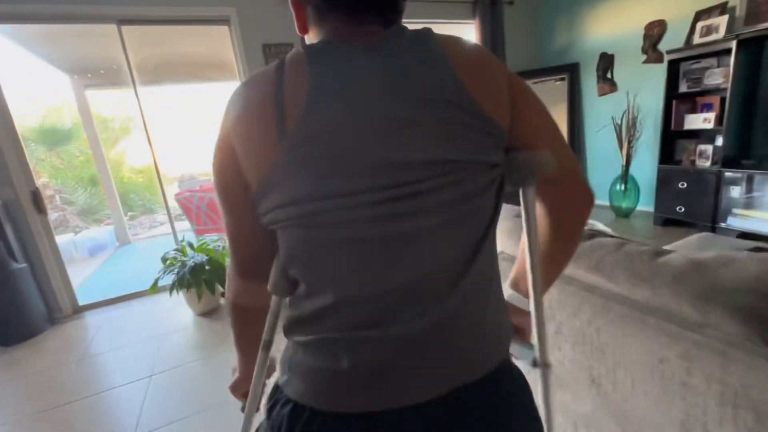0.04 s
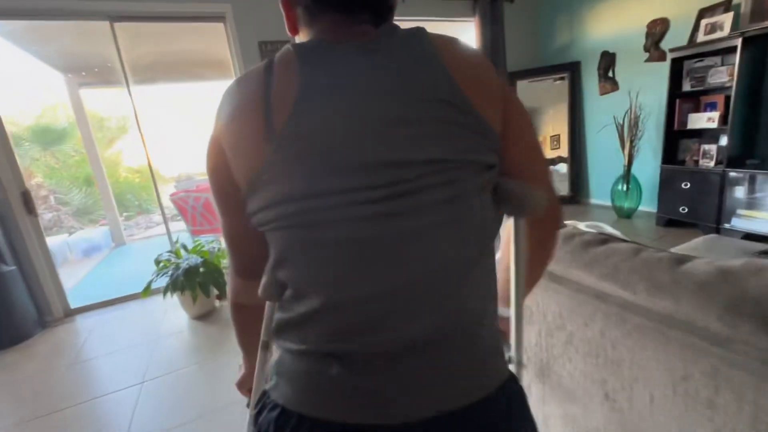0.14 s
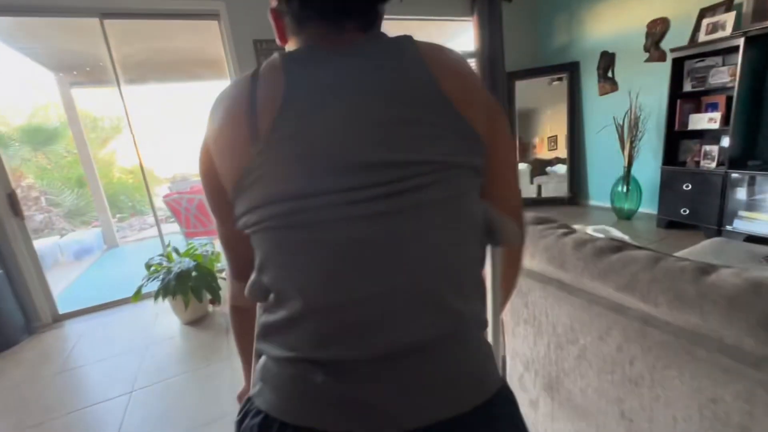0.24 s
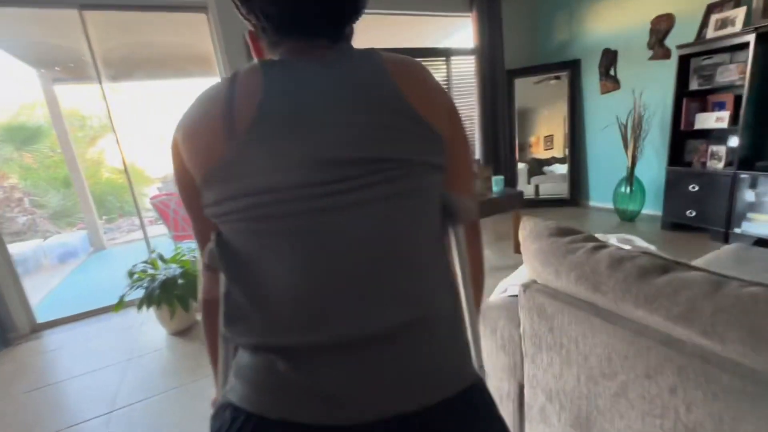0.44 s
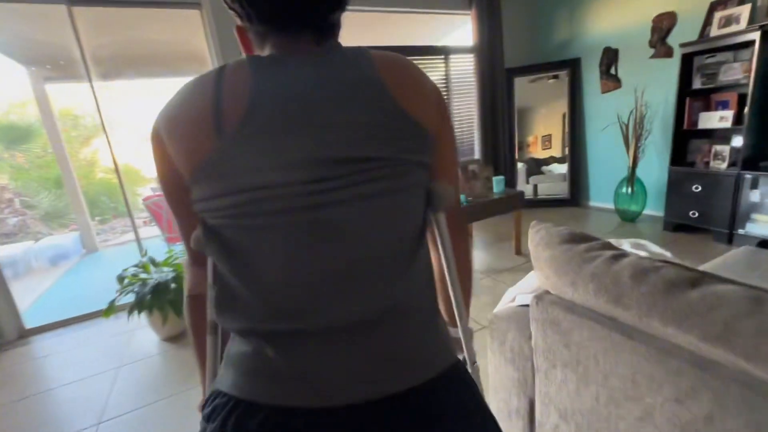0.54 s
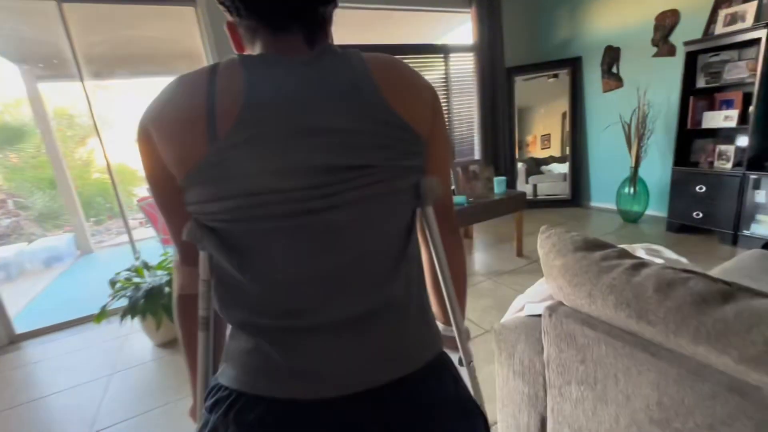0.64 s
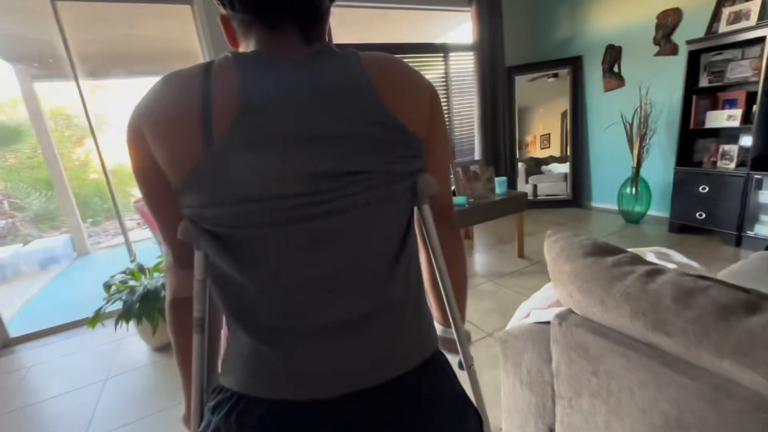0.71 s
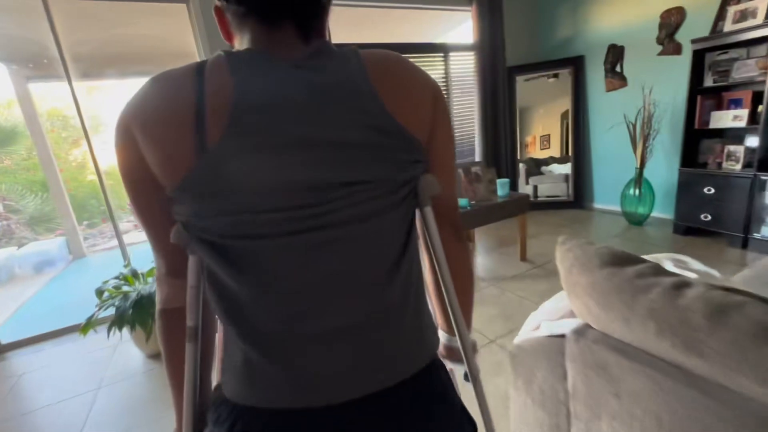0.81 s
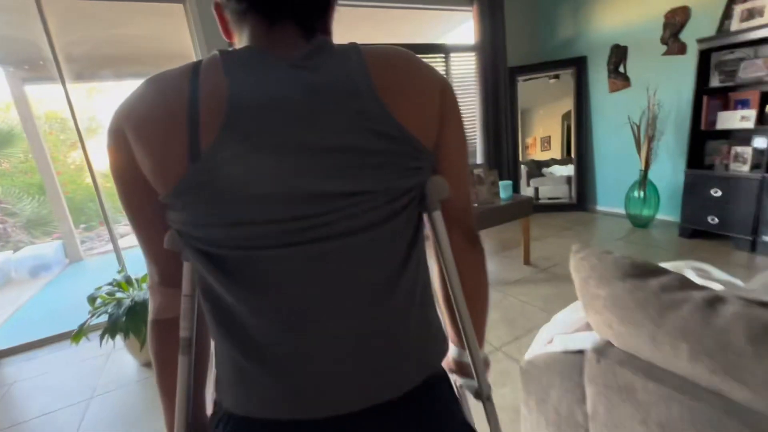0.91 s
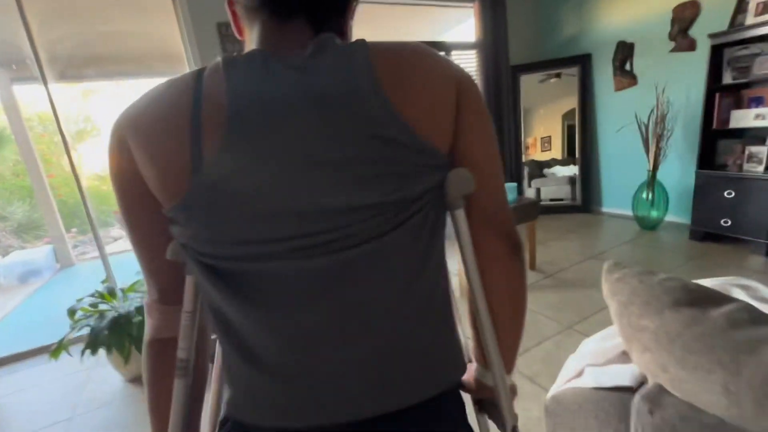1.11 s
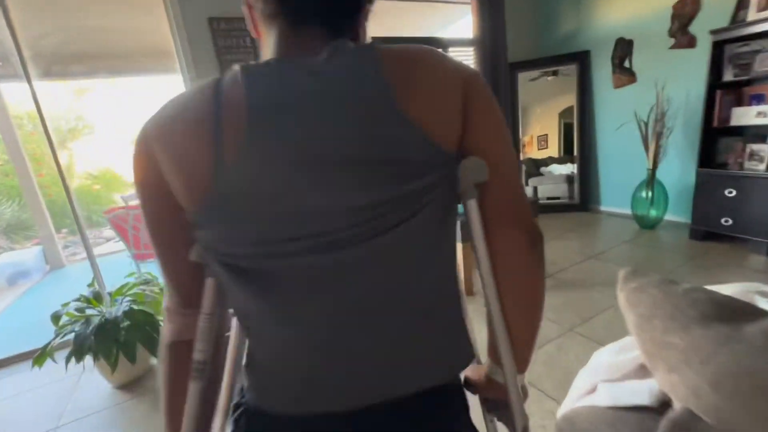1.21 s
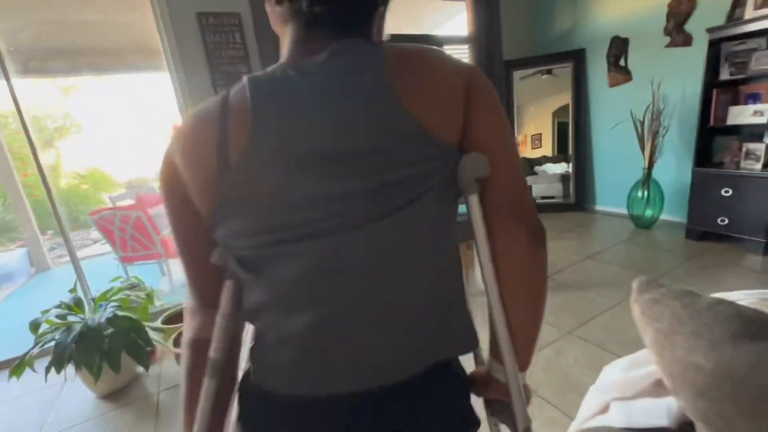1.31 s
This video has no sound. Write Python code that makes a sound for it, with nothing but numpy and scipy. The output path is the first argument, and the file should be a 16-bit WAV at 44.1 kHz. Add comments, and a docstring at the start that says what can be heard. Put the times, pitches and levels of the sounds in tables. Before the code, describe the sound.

An aluminium crutch lands once on a tiled living room floor with a sharp clack and a brief metallic ring. Clothes and a foot then brush softly, with a few light knocks over quiet room noise.

```python
"""A tiled living room: an aluminium crutch is planted. The rubber tip knocks, the loose telescoping
tube clacks against its sleeve and rings, and the room answers with wall echoes and a diffuse tail.
Then clothes and a foot brush along as the walker swings forward, with a few soft knocks and a low
rumble, over quiet room noise. Knocks and ringing are damped modes; the rest is shaped noise."""
import sys
import numpy as np
from scipy import signal
from scipy.fft import rfft, irfft
from scipy.io import wavfile
from scipy.ndimage import uniform_filter1d

SR = 44100
rng = np.random.default_rng(int(sys.argv[2]) if len(sys.argv) > 2 else 0)


def output_pcm(signal):
    """Save a mono or channel-first signal as 16-bit PCM at the path in sys.argv[1].

    Samples are clipped to [-1, 1] before scaling.
    """
    pcm = np.clip(np.atleast_2d(signal).T, -1, 1) * 32767
    wavfile.write(sys.argv[1], SR, np.round(pcm).astype(np.int16))


N = 59535
TIME_S = np.arange(N) / SR

# Spectra give relative density; pan and balance are left minus right.
# room noise spectrum: f/Hz, level/dB
AMBIENCE_SPECTRUM = [(25, -18), (60, -6), (90, -13), (120, -1.5), (155, -10), (200, -2), (260, -5.5),
                     (340, -5.5), (450, -8), (750, -10.5), (1150, -19.5), (2000, -21.5), (6700, -34),
                     (7700, -41), (8400, -50), (10000, -39), (12000, -53), (15000, -43)]
# room noise envelope: t/s, level/dB
AMBIENCE_ENVELOPE = [(0, -63), (.25, -60.5), (.55, -59), (.72, -59.5), (.95, -59), (1.24, -58.5),
                     (1.35, -62.5)]
# diffuse field: f/Hz, left-right correlation/1
COHERENCE = [(50, 0.02), (130, 0.77), (290, 0.78), (640, 0), (1400, 0.08), (15000, 0)]
# reverberation: f/Hz, t60/s
ROOM_DECAY = [(60, 1.1), (200, 0.54), (700, 0.5052), (1800, 0.78), (4800, 0.4648), (9000, 0.3),
              (14500, 0.1)]
# reflections: delay/s, left/dB, right/dB
WALL_ECHOES = [(0.012, -10, -20.5), (.0202, -13, -21), (.0495, -23, -4.5), (.054, -12, -11.5),
               (0.064, -34, -7)]
# microphone mismatch: f/Hz, balance/dB
STEREO_BALANCE = [(100, -0.5), (350, 2), (700, 1), (1300, 0.5), (2300, -2), (4400, 1.5), (6500, 5),
                  (8400, -8), (12000, 2)]

# rumble spectrum: f/Hz, level/dB
RUMBLE_SPECTRUM = [(20, -26), (40, -6), (55, 14), (75, -5), (120, -20), (400, -58), (2000, -90)]
# rumble envelope: t/s, level/dB
RUMBLE_ENVELOPE = [(0, -85), (.12, -72), (.21, -72), (.26, -62), (.35, -75), (.5, -71), (.58, -55),
                   (.68, -81), (.88, -75), (.95, -59), (1.08, -82), (1.17, -67), (1.35, -78)]
# clothes and foot spectrum: f/Hz, level/dB
BRUSH_SPECTRUM = [(200, -2.5), (500, -21), (850, -1.5), (1300, 3), (2100, -1), (3000, -3.5), (4500, -11.5),
                  (7000, -15.5), (10000, -14.5), (12000, -36), (15000, -28)]
# clothes and foot envelope: t/s, level/dB
BRUSH_ENVELOPE = [(0, -71), (.12, -71.5), (.2, -58.5), (.45, -66), (.7, -73.5), (.82, -66.5), (.9, -61.5),
                  (.96, -57.5), (1.04, -60.5), (1.11, -55), (1.16, -54), (1.21, -62.5), (1.29, -68),
                  (1.35, -57)]
# high hiss of movement, coloured by the right microphone's 8-9 kHz resonance: f/Hz, level/dB
HISS_SPECTRUM = [(2000, -6.5), (4300, -7.5), (6000, -9.5), (7700, -11), (8350, 4.5), (9000, -2.5),
                 (10000, -11.5), (11500, -23), (15000, -38)]
# movement hiss envelope: t/s, level/dB
HISS_ENVELOPE = [(0, -79), (.17, -69.5), (.5, -76), (.7, -75.5), (.8, -74), (.86, -65.5), (.94, -69),
                 (1.02, -72), (1.1, -66.5), (1.2, -72.5), (1.35, -70)]
# foot and crutch touches: t/s, mode gain/dB, f/Hz, t60/s, thud gain/dB, pan/dB
TOUCHES = [(0.134, -51.5, 1130, 0.025, -56, -14), (0.9415, -47, 3800, .012, -67, -2),
           (0.9888, -40, 1800, 0.012, -45.5, -6), (0.9948, -51.5, 860, 0.032, -51, 18.5),
           (1.3400, -35.5, 4400, 0.0041, -73, -3), (1.3420, -41.5, 1525, 0.023, -55, -10.5)]
# reverberation of the touches: f/Hz, level/dB
TOUCH_TAIL_SPECTRUM = [(100, -2), (350, 0), (650, 1.5), (1100, -2.5), (1700, 0), (4000, -3.5), (12000, -8)]

# tube modes: f/Hz
TUBE_MODES_HZ = [606, 774, 959, 1035, 1304, 1346, 1408, 1490, 1548, 1585, 1672, 1705, 1968, 2223, 2589]
# tube modes, same order: relative level/dB, t60/s
TUBE_DECAYS = [(-1, 0.53), (-1, 0.34), (-0.5, 0.48), (-15, 0.71), (-1, 0.42), (-0.5, 0.55), (0, 0.51),
               (-1, 0.44), (1.5, 0.39), (-10, 0.26), (-4, 0.49), (4, 0.36), (0, .42), (1.5, 0.47),
               (-11, 0.72)]
# clack spectrum: f/Hz, level/dB
CLACK_SPECTRUM = [(300, -15), (700, -4), (1150, -11), (1500, 4), (2350, 3), (3000, -4), (4200, -6.5),
                  (5600, -1), (7200, -9.5), (9200, 0), (10500, -5), (12000, -24.5), (15000, -11)]
# tube-on-sleeve impacts: t/s, relative level/dB, pan/dB
SLEEVE_HITS = [(0.2225, -24.5, -7), (0.2247, -25.5, -4), (0.2264, -18.5, -5.5), (0.2286, -20, 0.5)]
# tip and floor modes: f/Hz, relative level/dB, t60/s
TIP_MODES = [(244, -25, 0.024), (690, -14.5, 0.0084), (978, -9, 0.04), (1343, -7, 0.022),
             (1570, -5.5, 0.037), (2270, -7, 0.015)]
# reverberation of the tap: f/Hz, level/dB
TAP_TAIL_SPECTRUM = [(50, -8.5), (100, -9.5), (200, -8), (400, -3.5), (600, -0.5), (950, 3.5), (1150, 0.5),
                     (1450, 3.5), (1800, -1), (2400, -4.5), (2900, -9), (4200, -11), (5600, -3.5),
                     (7300, -12), (8300, -3.5), (9500, -2), (10500, -13), (12000, -40), (14500, -14)]

TAP_S, TIP_CUTOFF_HZ = 0.2240, 2550


def from_db(db):
    """Decibels to gain."""
    return 10 ** (np.asarray(db) / 20)


def unit_rms(x):
    """Scale to rms 1."""
    return x / np.sqrt(np.mean(x ** 2) + 1e-20)


def at_hz(points, hz):
    """Interpolate over log frequency."""
    points_hz, values = np.transpose(points)
    return np.interp(np.log(np.maximum(hz, 1)), np.log(points_hz), values)


def envelope(rows):
    """Gain curve from t/s, level/dB rows."""
    return from_db(np.interp(TIME_S, *np.transpose(rows)))


def pan(db):
    """Left and right gains."""
    return from_db(np.array([[db], [-db]]) / 2)


def click(t_s):
    """Unit impulse."""
    return 1.0 * (np.arange(N) == round(t_s * SR))


def ring(x, hz, t60_s):
    """Damped mode; a unit impulse rings at height 1."""
    radius = from_db(-60 / (t60_s * SR))
    step_rad = 2 * np.pi * hz / SR
    return signal.lfilter([.5, 0, -.5], [1, -2 * radius * np.cos(step_rad), radius ** 2], x + 1e-18)


def soften(x, cutoff_hz, order=2):
    """Low-pass: a yielding contact or dull reflection."""
    return signal.sosfilt(signal.butter(order, cutoff_hz, fs=SR, output="sos"), x + 1e-18)


def convolve(x, response):
    """Apply a stereo response."""
    return signal.fftconvolve(np.atleast_2d(x), response, axes=1)[:, :N]


def noise(spectrum):
    """Diffuse stereo noise at rms 1, alike on both sides in the bass."""
    hz = np.arange(N // 2 + 1) * SR / N
    alike = at_hz(COHERENCE, hz)
    mid, side = rfft(rng.standard_normal((2, N)))
    stereo = np.sqrt((1 + alike) / 2) * mid + np.sqrt((1 - alike) / 2) * side * np.array([[1], [-1]])
    return unit_rms(irfft(stereo * from_db(at_hz(spectrum, hz)), N))


def ambience():
    """Quiet room noise."""
    return noise(AMBIENCE_SPECTRUM) * envelope(AMBIENCE_ENVELOPE)


def reverb(x, spectrum, build_s=0.0085, hold_s=0.041):
    """Diffuse tail: builds, holds, dies faster in the treble."""
    hz = np.arange(N // 2 + 1) * SR / N
    wash = rfft(noise(spectrum))
    centres_hz, t60s_s = np.transpose(ROOM_DECAY)
    decay_s = np.maximum(TIME_S - hold_s, 0)
    tail = 0
    for weights, t60_s in zip(np.eye(len(t60s_s)), t60s_s):
        band = irfft(wash * at_hz(np.c_[centres_hz, weights], hz), N)
        tail += band * from_db(-60 * decay_s / t60_s)
    return convolve(x, tail * np.minimum(TIME_S / build_s, 1) ** 2)


def echoes(x):
    """Dull reflections off the walls and glass door."""
    response = sum(click(delay_s) * from_db([[left_db], [right_db]])
                   for delay_s, left_db, right_db in WALL_ECHOES)
    return convolve(soften(x.mean(axis=0), cutoff_hz=2500, order=1), response)


def rumble():
    """Low rumble as the weight shifts."""
    return noise(RUMBLE_SPECTRUM) * envelope(RUMBLE_ENVELOPE)


def brushing(grain_db=1):
    """Clothes and foot brush as the body swings through, with a high hiss to the right."""
    flicker = unit_rms(uniform_filter1d(rng.standard_normal(N), size=160))
    grain = from_db(grain_db * flicker)
    brush = unit_rms(noise(BRUSH_SPECTRUM) * grain) * envelope(BRUSH_ENVELOPE)
    hiss = unit_rms(noise(HISS_SPECTRUM) * grain) * envelope(HISS_ENVELOPE)
    return brush * pan(db=-2) + hiss * pan(db=-9.5)


def soft_knocks(reverb_gain_db=-38.5):
    """Light foot and crutch touches: one damped mode over a low thud."""
    knocks = 0
    for t_s, mode_db, hz, t60_s, thud_db, pan_db in TOUCHES:
        touch = soften(click(t_s), cutoff_hz=2380)
        mode = from_db(mode_db) * ring(touch, hz, t60_s)
        thud = from_db(thud_db) * ring(touch, hz=578, t60_s=0.019)
        knocks += (mode + thud) * pan(pan_db)
    return knocks + from_db(reverb_gain_db) * reverb(knocks.mean(axis=0), TOUCH_TAIL_SPECTRUM)


def tube_ring(gain_db=-38.5):
    """Struck tube: modes at random phase, left and right a quarter cycle apart."""
    modes = 0
    phases_cycles = rng.random(len(TUBE_MODES_HZ))
    for hz, (db, t60_s), left_cycles in zip(TUBE_MODES_HZ, TUBE_DECAYS, phases_cycles):
        right_cycles = left_cycles + rng.choice([-1, 1]) / 4
        onsets = np.array([click(TAP_S + left_cycles / hz), click(TAP_S + right_cycles / hz)])
        modes += ring(onsets, hz, t60_s) * from_db(db + gain_db)
    return soften(modes, TIP_CUTOFF_HZ)


def sleeve_rattle(rise_s=0.0013, t60_s=0.018, gain_db=-1):
    """The loose tube hits its sleeve: one noise burst per clack."""
    shape = np.minimum(TIME_S / rise_s, 1) * from_db(-60 * TIME_S / t60_s)
    clacks = 0
    for t_s, db, pan_db in SLEEVE_HITS:
        burst = noise(CLACK_SPECTRUM) * shape
        clacks += convolve(click(t_s), burst) * from_db(db + gain_db) * pan(pan_db)
    return clacks


def tip_knock(gain_db=-12, right_lag_s=0.00022):
    """A blow, rounded by the rubber, excites tip and floor modes."""
    impulse = np.array([click(TAP_S), click(TAP_S + right_lag_s)])
    blow = soften(impulse, TIP_CUTOFF_HZ) * from_db(gain_db) * pan(db=0.5)
    return sum(ring(blow, hz, t60_s) * from_db(db) for hz, db, t60_s in TIP_MODES)


def crutch(reverb_gain_db=-32.5):
    """The tip lands, the tube rattles and rings, the room answers."""
    hit = sleeve_rattle() - tip_knock()
    ringing = tube_ring()
    tail = from_db(reverb_gain_db) * reverb(click(TAP_S), TAP_TAIL_SPECTRUM)
    return hit + ringing + echoes(hit) + tail


def scene():
    """One crutch step over room noise."""
    return rumble() + crutch() + soft_knocks() + brushing() + ambience()


def record(dry, notch_hz=3395, notch_q=20, cutoff_hz=15500):
    """Two microphones: unequal colour, shared narrow notch, top cut."""
    balance_db = at_hz(STEREO_BALANCE, np.arange(N + 1) * SR / (2 * N))
    gains = from_db(np.array([balance_db, -balance_db]) / 2)
    coloured = irfft(rfft(dry, 2 * N) * gains)[:, :N]
    notched = signal.lfilter(*signal.iirnotch(notch_hz, notch_q, fs=SR), coloured)
    return signal.sosfilt(signal.ellip(10, .1, 80, cutoff_hz, fs=SR, output="sos"), notched)


dry = scene()
out = record(dry)
output_pcm(out)
```